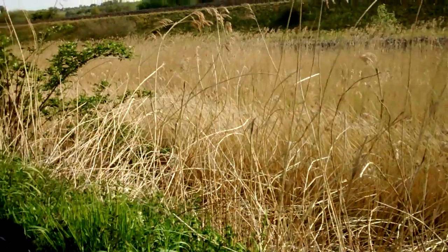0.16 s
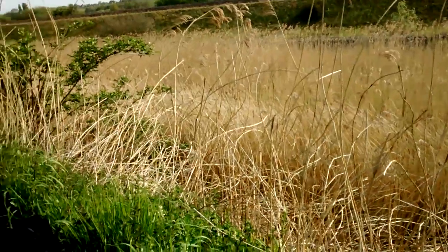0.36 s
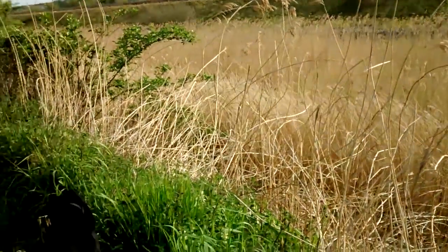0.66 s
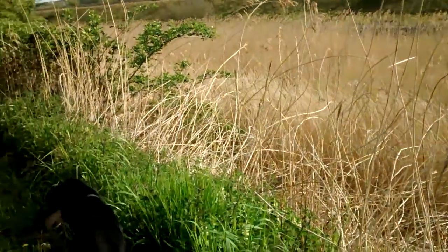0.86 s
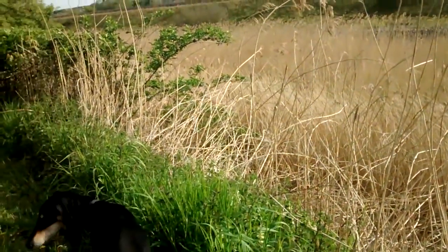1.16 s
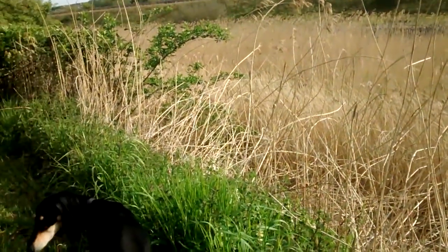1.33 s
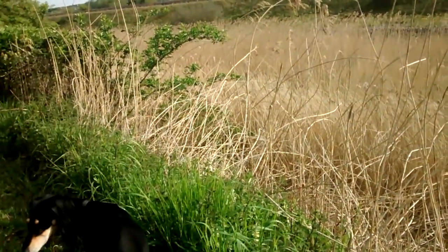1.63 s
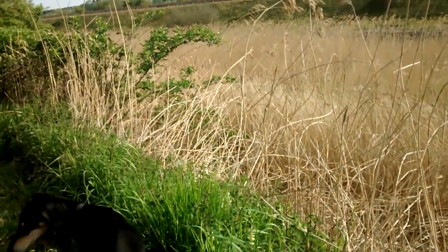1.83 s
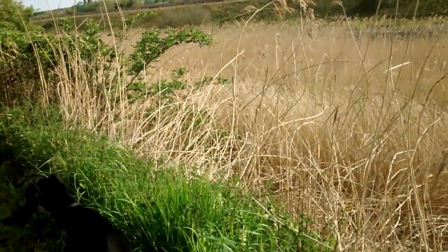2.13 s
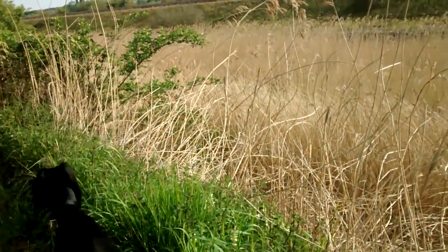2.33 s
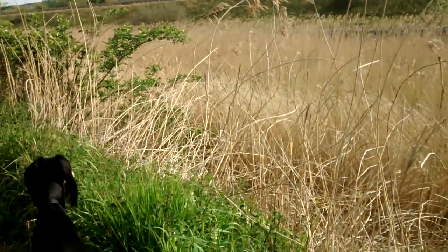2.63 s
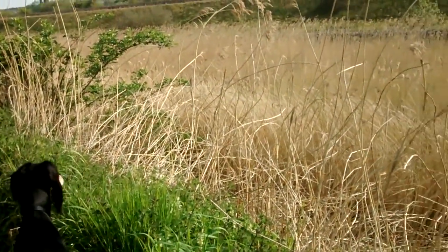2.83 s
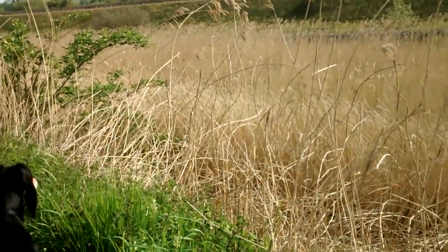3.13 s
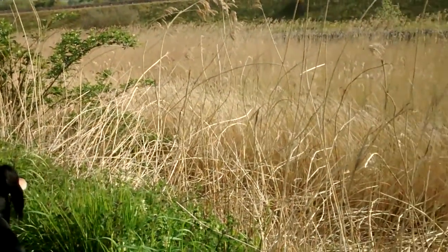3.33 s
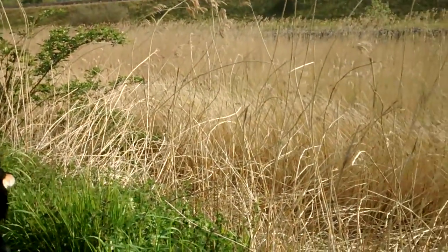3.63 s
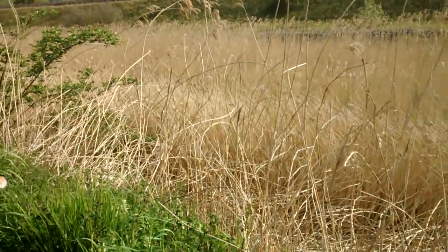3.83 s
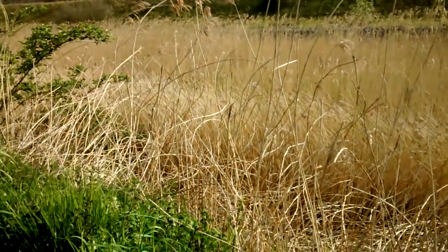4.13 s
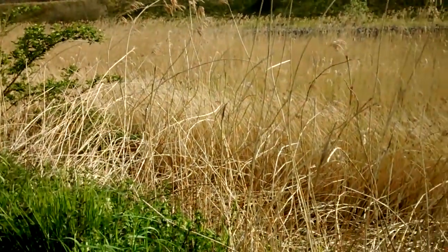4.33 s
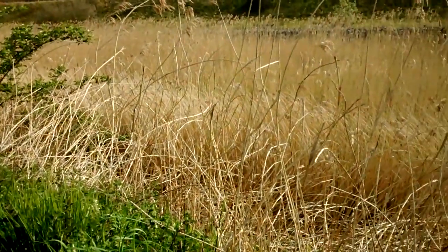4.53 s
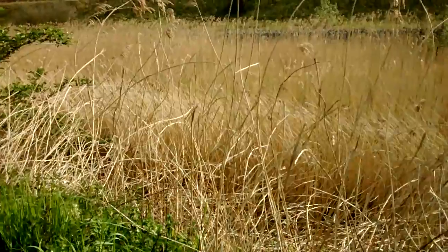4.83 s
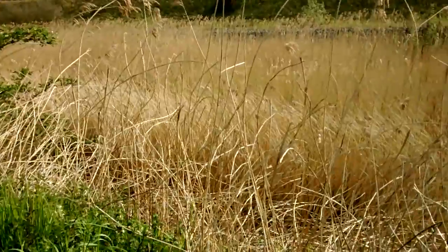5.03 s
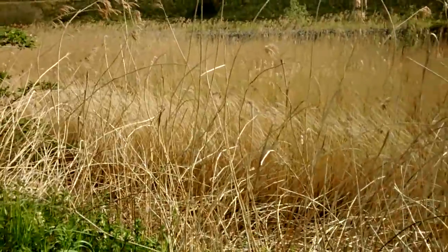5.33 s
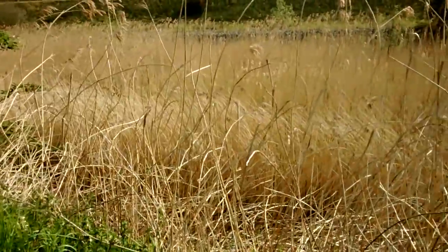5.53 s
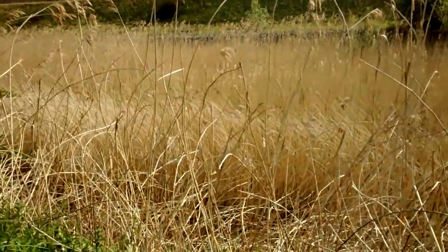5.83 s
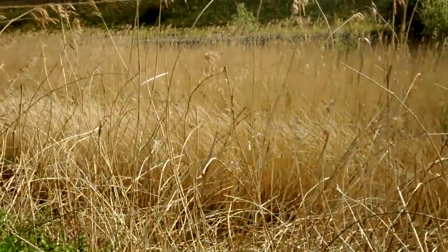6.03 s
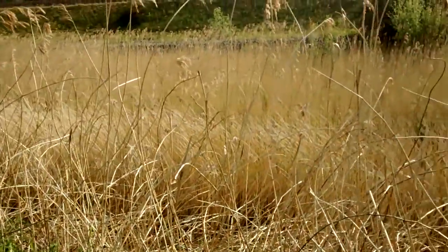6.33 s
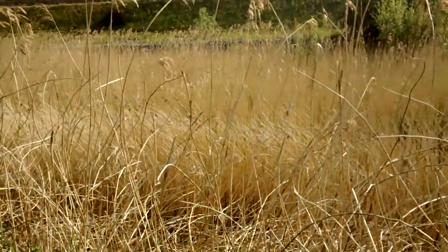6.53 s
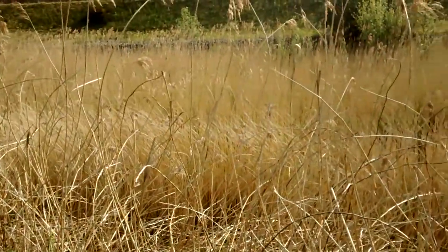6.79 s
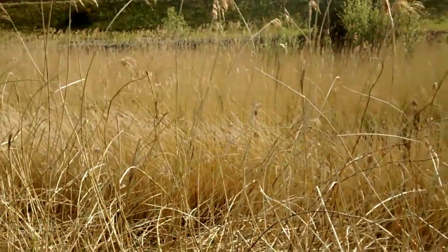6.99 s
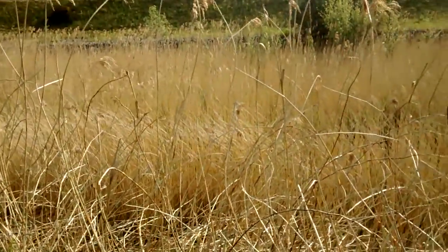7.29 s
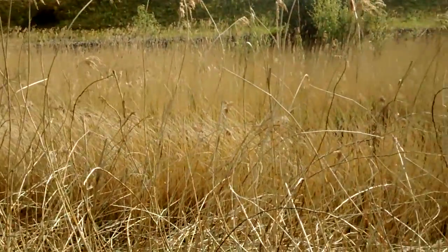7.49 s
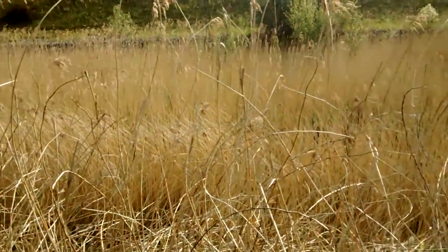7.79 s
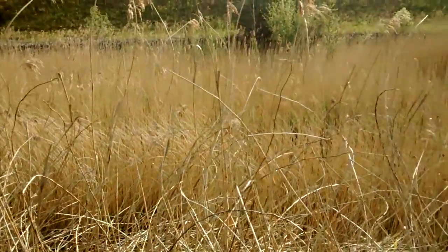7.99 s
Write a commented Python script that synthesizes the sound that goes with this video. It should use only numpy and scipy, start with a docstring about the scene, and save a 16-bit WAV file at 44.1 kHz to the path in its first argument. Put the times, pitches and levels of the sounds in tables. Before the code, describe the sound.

Reed warblers chatter nonstop in a dry reedbed, buzzing, churring and whistling, over a low wavering engine drone and soft distant traffic.

```python
"""Warblers sing in a reedbed over two distant droning engines, a wash of traffic and far birds' chatter.
Nasal overtone notes come first, with paired pulse-train buzzes and churrs, then arched swept-sine whistles.
From 2.6 s a vehicle speeds up, then cruises, as trills begin; double tweets come near 6 s.
From 7.2 s a rattle of resonant clicks runs on.
Stems snap now and then and scatter every bird note back to a small stereo microphone."""
import sys
import numpy as np
from scipy import signal
from scipy.fft import rfft, irfft, next_fast_len
from scipy.io import wavfile
from scipy.ndimage import uniform_filter1d

SR = 44100
rng = np.random.default_rng(int(sys.argv[2]) if len(sys.argv) > 2 else 0)


def file_out(sig):
    """Save sig as 16-bit WAV at sys.argv[1]."""
    # one column per channel
    cols = np.atleast_2d(sig).T
    # limit, then scale
    lim = np.clip(cols, -1, 1)
    pcm = np.round(lim * 32767).astype(np.int16)
    wavfile.write(sys.argv[1], SR, pcm)


N = 359415
T = np.arange(N) / SR  # time of every sample, s


def gain_of(db):
    """Logarithmic level: decibels to amplitude."""
    return 10 ** (np.asarray(db) / 20)


def evened(x):
    """Power normalization: scales to rms 1."""
    return x / np.sqrt(np.mean(x ** 2) + 1e-20)


def read(points, hz):
    """Spectral interpolation: a table's columns at the frequencies hz, on a log-frequency axis."""
    f, *columns = np.transpose(points)
    return [np.interp(np.log(hz + 1), np.log(f + 1), c) for c in columns]


def follow(rows):
    """Linear interpolation in time: a table's columns at every sample."""
    s, *columns = np.transpose(rows)
    return [np.interp(T, s, c) for c in columns]


def add(mix, s, sound):
    """Superposition: adds a sound into the mix at s seconds."""
    part = mix[round(max(s, 0) * SR):][:len(sound)]
    part += sound[:len(part)]


def wobble(size, span):
    """Low-passed random fluctuation of rms 1: noise averaged twice over span samples."""
    noise = rng.standard_normal(size)
    return evened(uniform_filter1d(uniform_filter1d(noise, span), span))


def whistle(length, start_hz, mid_hz, end_hz, db, flutter_db=2.5, waver=.012, rise=.003):
    """Frequency modulation: a sine on a parabola through three pitches, unsteady, quick to start."""
    u = np.linspace(0, 1, max(round(length * SR), 50))
    hz = start_hz * (1 - u) * (1 - 2 * u) + mid_hz * 4 * u * (1 - u) + end_hz * u * (2 * u - 1)
    hz *= 1 + waver * wobble(len(u), 35)
    cycles = np.cumsum(hz) / SR + rng.random()
    tone = np.sqrt(2) * np.sin(2 * np.pi * cycles)
    shape = np.clip(np.minimum(u * length / rise, (1 - u) / 0.079), 0, 1)
    return tone * shape * gain_of(db + flutter_db * wobble(len(u), 90))


def quick_slide(length, start_hz, end_hz, db):
    """Linear frequency sweep, made rough by strong random modulation of pitch and level."""
    return whistle(length, start_hz, (start_hz + end_hz) / 2, end_hz, db, flutter_db=4, waver=.045)


# arched whistles: start_s, length_s, top_hz, level_db, level_db of the partial a fifth below
ARCHED_NOTES = [(0.944, 0.055, 3480, -48, -66), (1.221, 0.0596, 3500, -46, -62.5),
                (1.45, 0.058, 3526, -44, -85), (1.685, 0.06, 3495, -48, -69),
                (1.924, 0.055, 3450, -47.5, -68), (2.21, 0.064, 3406, -50, -67),
                (2.448, 0.069, 3520, -49.5, -70), (3.518, 0.084, 3590, -55, -71),
                (3.776, 0.064, 3460, -53, -66), (3.875, 0.013, 3700, -51, -70),
                (4.372, 0.0186, 3660, -49, -63), (4.57, 0.023, 3730, -49, -68),
                (4.669, 0.05, 3460, -52.5, -68), (4.942, .056, 3550, -57.5, -68),
                (5.221, .04, 3560, -60, -70), (5.531, 0.051, 3520, -51.5, -75),
                (5.806, 0.062, 3436, -52.5, -68), (6.628, 0.058, 3600, -51.5, -68)]
ARCH_START, ARCH_END = 0.92, .93  # shares of the top pitch
SCOOP_S, SCOOP_FROM, SCOOP_DB = .012, .82, -8  # length, share of the top pitch, level against the note


def arches():
    """Frequency modulation: each note scoops up, then arches, with a parallel partial at 2/3 the pitch."""
    mix = np.zeros(N)
    for s, length, hz, db, under_db in ARCHED_NOTES:
        bend = hz * np.array([ARCH_START, 1, ARCH_END])
        scoop = hz * np.linspace(SCOOP_FROM, ARCH_START, 3)
        add(mix, s - SCOOP_S, whistle(SCOOP_S, *scoop, db + SCOOP_DB))
        add(mix, s, whistle(length, *bend, db) + whistle(length, *(bend * 2 / 3), under_db))
    return mix


# nasal arches: start_s, length_s, pitch_hz, level_db
NASAL_NOTES = [(.2, 0.0795, 529, -56), (0.436, 0.081, 494.5, -57.5), (0.684, .078, 524.5, -54.5)]
# the overtones that sound: order, as a multiple of the pitch
OVERTONE_ORDERS = (4, 6, 7, 8)
NASAL_DB, NASAL_START, NASAL_END = (-9, -1, -4.5, -7), .89, 0.97  # dB per overtone; shares of the pitch


def nasal_notes():
    """Harmonic series: upper overtones of a low pitch arch together and give a nasal timbre."""
    mix = np.zeros(N)
    for s, length, hz, db in NASAL_NOTES:
        for k, rel_db in zip(OVERTONE_ORDERS, NASAL_DB):
            bend = k * hz * np.array([NASAL_START, 1, NASAL_END])
            add(mix, s, whistle(length, *bend, db + rel_db, flutter_db=4, waver=.014))
    return mix


# level peeps: start_s, length_s, pitch_hz, level_db
PEEP_NOTES = [(.11, 0.031, 3590, -58.5), (0.629, .02, 3270, -58), (0.849, .03, 3430, -60),
              (1.288, .03, 3240, -62), (4.858, 0.052, 3150, -65), (0.549, 0.018, 3600, -56),
              (1.915, .048, 5620, -59.5), (2.129, .049, 5660, -63), (2.136, 0.053, 3850, -57.5),
              (2.23, 0.061, 5010, -61), (2.396, 0.054, 5740, -66), (2.886, .043, 4030, -56),
              (2.964, 0.033, 4900, -60), (2.969, .03, 3460, -53.5), (3.148, 0.047, 4940, -58),
              (3.523, .059, 4730, -64), (3.79, .034, 4600, -65), (3.997, 0.048, 5560, -62),
              (4.122, .035, 2760, -60), (4.437, 0.037, 2940, -58), (4.744, 0.047, 2960, -58.5),
              (4.949, 0.047, 4130, -62), (5.217, .043, 4910, -68), (5.3, .025, 3710, -64),
              (5.33, .02, 3300, -59), (5.379, 0.042, 3470, -50), (5.458, .045, 3340, -53),
              (5.554, 0.029, 2950, -55), (5.651, 0.043, 3600, -55), (5.717, .085, 3470, -56.5),
              (5.831, .038, 4120, -60), (6.282, .031, 4740, -65), (6.283, .02, 3520, -57),
              (6.948, .018, 3340, -52.5), (7.062, 0.016, 4070, -50.5), (7.22, 0.015, 4060, -49.5),
              (7.388, 0.013, 3510, -50), (7.55, .033, 3545, -47.5), (8.121, 0.038, 3930, -40.5)]
PEEP_ENDS = 0.99  # share of the pitch at both ends


def peeps():
    """Nearly constant frequency: short tones that barely arch."""
    mix = np.zeros(N)
    for s, length, hz, db in PEEP_NOTES:
        add(mix, s, whistle(length, hz * PEEP_ENDS, hz, hz * PEEP_ENDS, db))
    return mix


# trills: start_s, length_s, gap_s from pip to pip, pitch_hz, level_db
TRILL_RUNS = [(2.672, .18, .036, 3485, -54), (3.0, .095, 0.037, 3570, -56.5), (3.205, .2, .0345, 3510, -55),
              (3.723, .04, 0.016, 3090, -56.5), (4.259, .04, 0.022, 3050, -60),
              (5.056, .15, .039, 3720, -58), (6.064, .11, 0.035, 3540, -50.5),
              (6.308, .11, .0375, 3520, -50.5), (6.477, .055, .011, 3880, -49),
              (7.234, .06, .021, 3580, -53.5)]
PIP_SHARE, PIP_END, PIP_SPREAD_DB = 0.72, 0.933, 1  # share of the gap, share of the pitch, dB


def trills():
    """Periodic repetition: evenly spaced falling pips."""
    mix = np.zeros(N)
    for s, length, gap, hz, db in TRILL_RUNS:
        for at in np.arange(s, s + length - gap / 2, gap):
            pip_db = db + PIP_SPREAD_DB * rng.standard_normal()
            add(mix, at, whistle(PIP_SHARE * gap, hz, hz, hz * PIP_END, pip_db))
    return mix


# slides: start_s, length_s, start_hz, end_hz, level_db
SLIDE_NOTES = [(.85, 0.035, 5930, 4500, -67), (0.939, .045, 3980, 4120, -51.5),
               (.995, 0.026, 6220, 4900, -62), (1.28, 0.043, 6350, 4280, -60),
               (1.43, 0.029, 6540, 4900, -62), (2.32, .026, 4600, 4930, -63),
               (2.514, 0.026, 4160, 4680, -54.5), (2.634, .022, 4440, 3850, -56),
               (3.39, .045, 4300, 4040, -58), (3.548, .02, 3220, 2850, -59), (3.75, .04, 1800, 2300, -64),
               (4.058, 0.027, 3150, 2860, -56.5), (4.073, .085, 1870, 2286, -64),
               (4.346, .075, 1850, 2410, -65), (4.364, 0.038, 3950, 4340, -57),
               (4.47, 0.023, 3100, 3900, -57), (4.71, 0.037, 3200, 2840, -55.5),
               (4.82, 0.028, 3220, 2700, -55.5), (4.953, .035, 3250, 2750, -57),
               (5.13, .038, 3170, 2710, -60), (5.176, .015, 3150, 2930, -55),
               (5.637, 0.024, 3300, 2830, -59), (6.443, 0.037, 3400, 3580, -48.5),
               (6.525, .023, 4750, 5200, -60), (6.665, 0.0154, 4670, 3670, -55),
               (7.06, 0.02, 5200, 7300, -55), (7.135, .054, 6870, 5220, -45),
               (8.103, 0.019, 4500, 3940, -46.5)]


def slides():
    """Linear frequency sweep: tones that rise or fall steadily."""
    mix = np.zeros(N)
    for s, length, start_hz, end_hz, db in SLIDE_NOTES:
        add(mix, s, whistle(length, start_hz, (start_hz + end_hz) / 2, end_hz, db))
    return mix


# quick upward flicks: start_s, top_hz, level_db
FLICK_NOTES = [(.09, 4480, -50.5), (.335, 4300, -54), (.575, 4060, -55), (0.824, 4380, -53),
               (3.633, 5340, -57), (3.648, 4700, -51.5), (5.02, 4230, -56), (5.055, 3970, -53),
               (5.096, 3980, -53.5), (5.135, 3930, -55), (5.175, 3770, -56), (6.89, 3730, -53.5),
               (6.945, 3534, -52.5), (7.08, 6560, -56.5)]
FLICK_S, FLICK_FROM = .015, .64  # length, share of the top pitch


def flicks():
    """Rapid upward frequency sweep, heard as a chip."""
    mix = np.zeros(N)
    for s, hz, db in FLICK_NOTES:
        add(mix, s, quick_slide(FLICK_S, FLICK_FROM * hz, hz, db))
    return mix


# high double tweets: start_s of the loud one, top_hz, level_db
TWEET_PAIRS = [(5.967, 6960, -54.5), (6.09, 7000, -52.5), (6.2, 7150, -53.5), (6.318, 7140, -52)]
TWEET_S, TWEET_FROM = 0.0146, .82  # length, share of the top pitch
FIRST_S, FIRST_DB = .019, -7  # the faint one: lead time, level against the loud one
LOWER, LOWER_DB = .7, -5  # lower partial: pitch ratio, level


def tweets():
    """Paired upward sweeps: a faint tweet precedes a loud one, each with a parallel lower partial."""
    mix = np.zeros(N)
    for s, hz, db in TWEET_PAIRS:
        for at, level_db in ((s - FIRST_S, db + FIRST_DB), (s, db)):
            add(mix, at, quick_slide(TWEET_S, TWEET_FROM * hz, hz, level_db))
            lower_hz = LOWER * hz
            add(mix, at, quick_slide(TWEET_S, TWEET_FROM * lower_hz, lower_hz, level_db + LOWER_DB))
    return mix


def throbs(length, per_s, pulse_hz, overtones, sag, rough, fill):
    """Pulse-train harmonics: the rate sags within each throb and uneven pulses smear the overtones."""
    turns = np.arange(round(length * SR)) * per_s / SR
    size_db = 2.2 * rng.standard_normal(12)[turns.astype(int)]
    throb = np.sin(np.pi * np.minimum(turns % 1 / 1.03, 1)) ** 2 + fill
    arch = 0.51 + np.sin(np.pi * turns / turns[-1])
    swell = evened(throb * gain_of(size_db) * arch)
    rate_hz = pulse_hz * (1 - sag * (turns % 1 - .4) + rough * wobble(len(turns), 25))
    cycles = np.cumsum(rate_hz) / SR
    uneven = 1 + .5 * np.cos(np.pi * cycles)  # strong and weak pulses alternate: lines between overtones
    tones = sum(np.sqrt(2) * gain_of(db) * np.cos(2 * np.pi * k * cycles) for k, db in overtones)
    return swell * uneven * tones


# buzzes, mostly in pairs: start_s, pulse_rate_hz, fifth_db, sixth_db, high_db (sets seventh and eighth)
BUZZ_NOTES = [(.329, 900, -55, -63, -67), (.462, 882, -56, -57, -65), (1.099, 885, -54.5, -56, -66),
              (1.259, 876, -57, -55, -68), (1.811, 902, -54.5, -60.5, -72), (1.947, 863, -58, -55, -67),
              (2.64, 900, -56.5, -56.5, -67), (2.775, 888, -57, -55.5, -67), (3.195, 900, -58, -63, -62),
              (3.335, 878, -52.5, -60, -63), (3.89, 891, -56.5, -61.5, -65), (4.025, 876, -54, -60, -62.5),
              (4.636, 913, -53, -63, -65.5), (4.759, 901, -55.5, -58.5, -65), (5.295, 900, -56, -63, -67),
              (5.43, 857, -54, -57.5, -64.5), (6.771, 996, -77, -56.5, -65), (6.892, 950, -69, -59, -59),
              (7.953, 996, -70, -59.5, -63.5)]
BUZZ_PER_S = 45.9  # throbs per second


def buzzes():
    """Amplitude modulation: a second bird's pulse overtones swell in four throbs."""
    mix = np.zeros(N)
    for s, hz, fifth_db, sixth_db, high_db in BUZZ_NOTES:
        overtones = zip(range(5, 9), (fifth_db, sixth_db, high_db - 4, high_db - 2))
        add(mix, s, throbs(4 / BUZZ_PER_S, BUZZ_PER_S, hz, overtones, sag=.065, rough=.023, fill=.33))
    return mix


# churrs: start_s, length_s, level_db of the fourth overtone
CHURR_NOTES = [(0, 0.068, -58.5), (.195, .04, -60), (.7, 0.056, -61), (1.529, .08, -60),
               (2.185, 0.1, -57.5), (2.387, 0.13, -56.5), (3.006, 0.089, -62.5), (3.118, .04, -63.5),
               (3.52, 0.051, -59), (3.724, 0.15, -61), (4.246, 0.083, -61.5), (4.451, 0.062, -58.5),
               (4.981, .06, -57.5), (5.154, .06, -62), (5.597, 0.095, -62.5), (5.806, .062, -59.5),
               (6.473, 0.087, -70), (6.585, 0.049, -57.5), (7.615, .068, -64), (7.86, 0.083, -58.5)]
CHURR_HZ, CHURR_PER_S = 1058, 57  # pulse rate in Hz, chirps per second


def churrs():
    """Joint frequency and amplitude modulation: trains of falling chirps of two overtones."""
    mix = np.zeros(N)
    for s, length, db in CHURR_NOTES:
        overtones = zip(range(3, 5), (db - 2.1, db))
        add(mix, s, throbs(length, CHURR_PER_S, CHURR_HZ, overtones, sag=.24, rough=.035, fill=.6))
    return mix


def throat(x, modes):
    """Parallel resonators: each mode filters the sound twice for steep skirts."""
    out = np.zeros(len(x))
    for hz, width, db in modes:
        b, a = signal.iirpeak(hz, hz / width, SR)
        out += gain_of(db) * signal.lfilter(b, a, signal.lfilter(b, a, x))
    return out


# loudness curve of the rattle: time_s, peak_db
RATTLE_PEAKS = [(7.2, -50), (7.33, -47), (7.43, -44), (7.52, -47), (7.63, -43.5), (7.71, -48), (7.82, -44),
                (7.92, -49)]
# throat resonances, before the shift of each click: centre_hz, width_hz of one pass, level_db
THROAT_MODES = [(2800, 200, -2), (3650, 170, 9), (4850, 200, -5)]
RATTLE_START_S, RATTLE_GAP_S, RATTLE_CLICKS = 7.2117, .02037, 35
RATTLE_SPREAD_DB, RATTLE_JITTER_S, RATTLE_PITCH_SPREAD = 2.5, .0008, .035  # the last is a share


def rattle():
    """Impulse response: nearly even dry clicks ring a throat that shifts a little from click to click."""
    mix = np.zeros(N)
    late, size, shift = rng.standard_normal((RATTLE_CLICKS, 3)).T
    times = RATTLE_START_S + RATTLE_GAP_S * np.arange(RATTLE_CLICKS) + RATTLE_JITTER_S * late
    peaks_db = np.interp(times, *np.transpose(RATTLE_PEAKS)) + RATTLE_SPREAD_DB * size
    for s, db, scale in zip(times, peaks_db, 1 + RATTLE_PITCH_SPREAD * shift):
        click = throat(signal.unit_impulse(600), np.multiply(THROAT_MODES, (scale, 1, 1)))
        add(mix, s, gain_of(db) * click / abs(click).max())
    return mix


# dry stems snapping: start_s, level_db of the noise before shaping
STEM_SNAPS = [(3.342, -62), (5.544, -63), (7.296, -61), (7.781, -63), (7.989, -63)]


def stem_ticks():
    """Transient noise: differenced, so bright, and dying exponentially."""
    mix = np.zeros(N)
    for s, db in STEM_SNAPS:
        bright = np.diff(rng.standard_normal(120))
        add(mix, s, gain_of(db) * bright * np.exp(-np.arange(119) / 30))
    return mix


# loudness curve of the far birds: time_s, level_db
CHATTER_LEVEL = [(0.0, -65.5), (0.7, -61), (1.45, -66), (2.06, -62.5), (2.2, -66.5), (3.24, -63.5),
                 (3.61, -65), (3.75, -66), (4.06, -68), (5.54, -59), (6.13, -66), (6.51, -60), (6.67, -64),
                 (7.06, -64.5), (7.47, -58.5), (7.72, -63), (8.15, -64.5)]
CHATTER_HZ, CHATTER_SPREAD, CHATTER_PER_S = 3600, .12, 700  # median pitch, log-pitch spread, chips per s


def chatter():
    """Random superposition: short gliding chips, mostly falling, from birds too far to tell apart."""
    mix = np.zeros(N)
    for s, length, pitch, glide, size in rng.random((round(CHATTER_PER_S * T[-1]), 5)):
        # logistic scatter of log pitch
        hz = CHATTER_HZ * np.exp(CHATTER_SPREAD * np.log(pitch / (1 - pitch)) / 1.822)
        t = np.arange(round((0.0041 + 0.017 * length) * SR)) / SR
        chip = np.sin(2 * np.pi * hz * t * (1 - 8 * (glide - .3) * t)) * np.hanning(len(t))
        add(mix, s * T[-1], chip * gain_of(-1.5 * np.log(size + .01)))
    return gain_of(follow(CHATTER_LEVEL)[0]) * evened(mix)


# the two ports as the birds reach them: frequency_hz, left_lead_rad, left_minus_right_db
PORT_LEAD = [(1510, -15, -9), (2100, 3.5, -19.5), (2406, 4, -0.5), (4080, 6.5, -6.5), (4300, 7, -8.5),
             (4510, 11, -13.5), (5950, 13.5, -4), (5720, 20, -5), (5670, 16.5, 2), (7850, 8.5, -3),
             (9100, 16, 4)]


def ports(x):
    """Interaural-like differences: sets left against right in phase and level at constant mean power."""
    size = next_fast_len(N)
    lead, pan_db = read(PORT_LEAD, np.fft.rfftfreq(size, 1 / SR))
    sides = gain_of([pan_db / 2, -pan_db / 2])
    sides /= np.sqrt((sides ** 2).mean(0))
    turn = np.exp(.5j * np.array([lead, -lead]))
    return irfft(rfft(x, size) * sides * turn, size)[:, :N]


REEDS_T60, REEDS_DB = .5, -8  # decay by 60 dB in s, level against the direct song


def reeds(x):
    """Multiple scattering from stems: sparse decaying taps of random sign, different per channel."""
    taps = np.zeros((2, SR // 2))
    slots = np.arange(200, SR // 2 - 20, 20)
    at = slots + rng.integers(0, 20, (2, (SR // 2 - 201) // 20))
    np.put_along_axis(taps, at, rng.choice([-1., 1.], at.shape), 1)
    taps *= gain_of(-60 * T[:SR // 2] / REEDS_T60)
    taps /= np.linalg.norm(taps[0])
    return gain_of(REEDS_DB) * signal.fftconvolve(x[None], taps, axes=1)[:, :N]


# two engines, nominal levels: time_s, firing_rate_hz, first_order_db, second_order_db
HIGHER_ENGINE = [(0, 75.64, -54.5, -55), (3, 76.43, -58, -60.5), (3.6, 74.1, -53.5, -60.5),
                 (4.6, 76.93, -54, -60), (5.5, 78.18, -53.5, -61), (8.15, 77.1, -54, -59.5)]
LOWER_ENGINE = [(0, 71.13, -63.5, -62), (2.5, 72.03, -73.5, -60.5), (3.6, 71.26, -77, -59.5),
                (4.5, 72.47, -65, -63.5), (6, 72.65, -68.5, -59.5), (8.15, 72.5, -64, -57.5)]
# a vehicle speeds up, then cruises, nominal levels: time_s, cycle_hz, third_db, sixth_db, eighth_db
REVVING_VEHICLE = [(2.6, 12, -75, -75, -80), (3, 18, -62, -64, -71), (3.45, 23, -57, -59, -62),
                   (3.85, 26.7, -61, -63, -62), (4.3, 26.5, -64, -66, -70), (5, 27, -66, -66, -70),
                   (8.15, 27, -68, -66, -75)]


def drone():
    """Harmonic orders and beating: low engine orders are wavering sines, close enough to beat."""
    mix = np.zeros((2, N))
    for rows, orders in ((HIGHER_ENGINE, (1, 2)), (LOWER_ENGINE, (1, 2)), (REVVING_VEHICLE, (3, 6, 8))):
        hz, *levels = follow(rows)
        turns = np.cumsum(hz * (1 + 0.00357 * wobble(N, 9000))) / SR + rng.random()
        for place, (k, db) in enumerate(zip(orders, levels)):
            # the left leads in phase; each next listed order leads more and leans further left
            lead = np.array([[0.54 * (place + 1)], [0]])
            side_db = 0.29 + 1.4 * place * np.array([[1], [-1]])
            level = gain_of(db + side_db + 0.96 * wobble(N, 7000))
            mix += np.sqrt(2) * level * np.sin(2 * np.pi * k * turns + lead)
    return mix


# mean spectrum of traffic and microphone hiss: frequency_hz, level_db per Hz
WASH_SPECTRUM = [(15, -70.5), (40, -68.5), (100, -83), (250, -80), (480, -79.5), (750, -78.5), (1250, -88),
                 (1600, -89.5), (2200, -94), (3500, -102.5), (5000, -94), (6300, -98), (8000, -101),
                 (11000, -101.5), (15500, -102)]
# upper traffic roar, only its departure from the mean is used: time_s, level_db
ROAR_SWELL = [(0.0, -65.5), (0.07, -61.5), (0.36, -60.5), (0.59, -67.5), (1.09, -61.5), (1.86, -68),
              (2.22, -62.5), (2.84, -69.5), (3.18, -62.5), (3.97, -69), (4.86, -63.5), (5.47, -68.5),
              (5.76, -63), (6.81, -69), (6.9, -62), (7.63, -66), (8.15, -62)]
# stereo balance: frequency_hz, left_minus_right_db
WASH_BALANCE = [(40, -1), (100, 1), (250, 4), (700, 5), (1250, 0), (2000, -1.5), (4000, -3), (6300, 0)]
# likeness of the channels: frequency_hz, coherence (0 to 1)
WASH_LIKENESS = [(40, .62), (100, .5), (250, .1), (480, .05), (800, .35), (1250, .22), (2000, 0)]
# inverted, late likeness between channels: frequency_hz, left_in_right (share), right_in_left (share)
CROSS_SHARES = [(300, 0, 0), (1150, .17, .28), (2400, .4, .3), (3600, .38, .2), (5000, .14, .12),
                (6800, .1, .24), (10000, .13, .23), (15000, .07, .16)]
CROSS_S = 1 / 2560  # delay of the crossed share


def wash():
    """Partially coherent noise: random short-time spectra with faint patches; roar near 1.6 kHz swells."""
    frames, hz = N // 256 + 5, np.fft.rfftfreq(1024, 1 / SR)
    a, b, c, d, patches = rng.standard_normal((frames, 513, 5)).T
    patches = evened(uniform_filter1d(uniform_filter1d(patches, 14, 0), 14, 1))
    level_db, = read(WASH_SPECTRUM, hz)
    pan_db, = read(WASH_BALANCE, hz)
    same, = read(WASH_LIKENESS, hz)
    forward, backward = read(CROSS_SHARES, hz)
    late = np.exp(2j * np.pi * hz * CROSS_S)
    alike = (same - forward * late - backward / late)[:, None]
    left = a + 1j * b
    # the right is the shared part of the left plus independent noise
    unshared = np.sqrt(np.clip(1 - abs(alike) ** 2, 0, 1)) * (c + 1j * d)
    z = np.array([left, alike.conj() * left + unshared])
    s, roar_db = np.transpose(ROAR_SWELL)
    roar_db = np.interp(np.arange(frames) * 256 / SR, s, roar_db - roar_db.mean())
    reach = np.exp(-(np.log((hz + 1) / 1600) / .3) ** 2)[:, None]
    sides = np.array([pan_db, -pan_db])[:, :, None] / 2
    z *= gain_of(level_db[:, None] + sides + reach * roar_db + 1.19 * patches)
    return np.sqrt(SR / 1024 * 3 / 4) * signal.istft(z, nperseg=1024, noverlap=768)[1][:, :N]


def birds():
    """Superposition of all near song and the stem ticks."""
    whistles = arches() + nasal_notes() + peeps() + trills() + slides()
    chips = flicks() + tweets()
    return whistles + chips + buzzes() + churrs() + rattle() + stem_ticks()


def scene():
    """Direct and scattered sound: song with its scatter, over engines and wash."""
    song = birds() + chatter()
    return ports(song) + reeds(song) + drone() + wash()


EDGE_HZ = 15550  # upper band limit


def record(dry):
    """Low-pass filtering: the band limit of the recorder, a linear-phase filter."""
    low_pass = signal.firwin(1023, EDGE_HZ, window=("kaiser", 9), fs=SR)
    return signal.oaconvolve(dry, low_pass[None], "same")


dry = scene()
out = record(dry)
file_out(out)
```